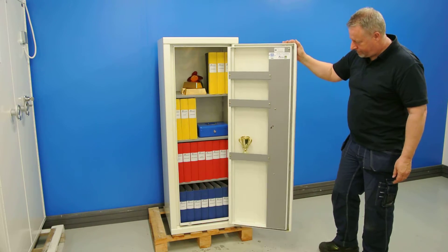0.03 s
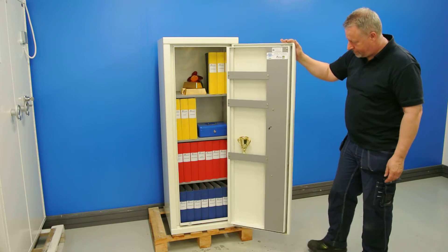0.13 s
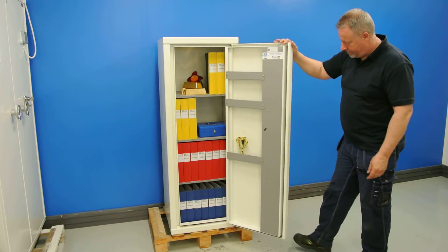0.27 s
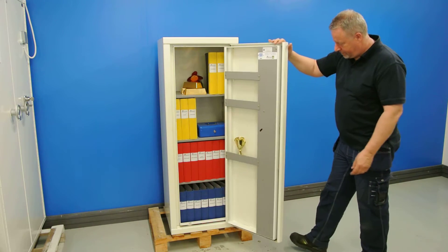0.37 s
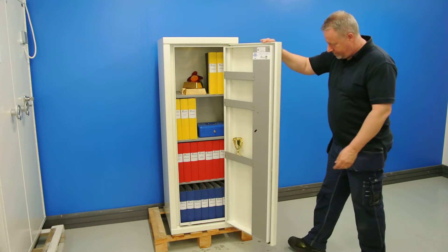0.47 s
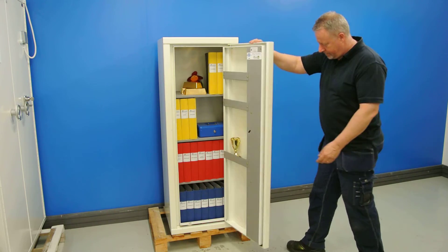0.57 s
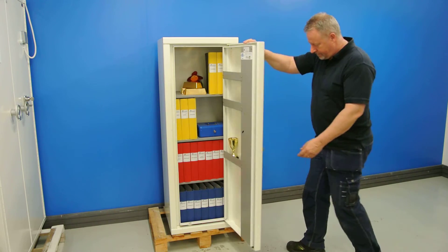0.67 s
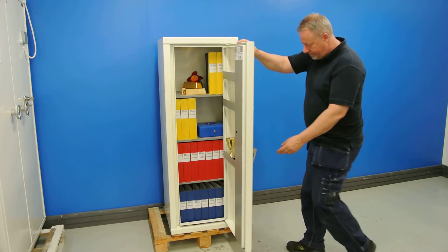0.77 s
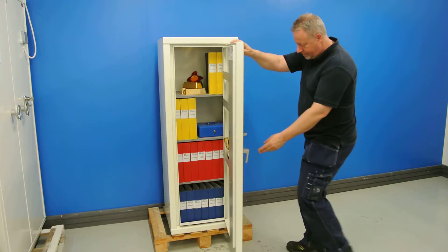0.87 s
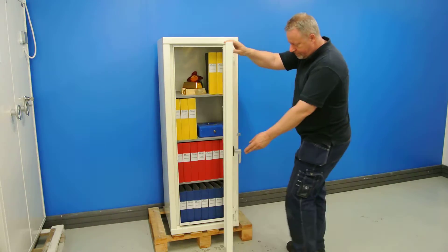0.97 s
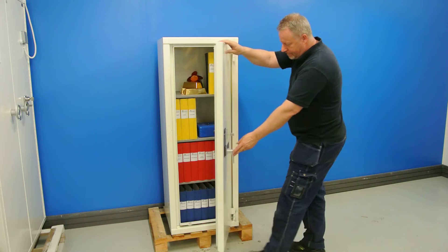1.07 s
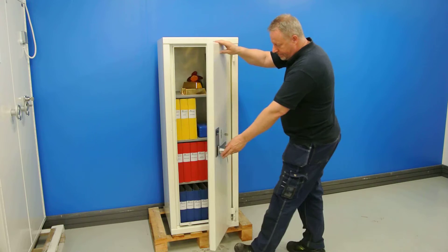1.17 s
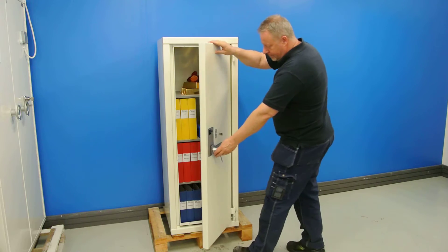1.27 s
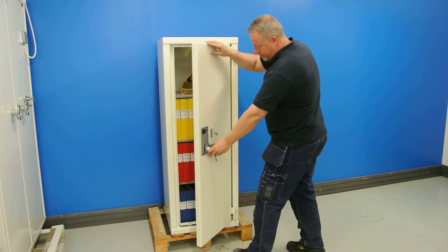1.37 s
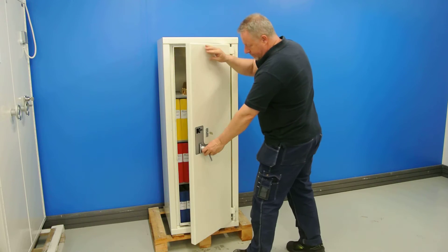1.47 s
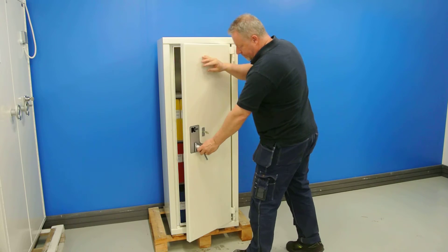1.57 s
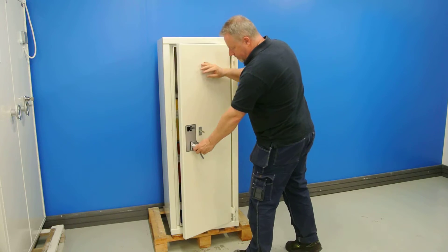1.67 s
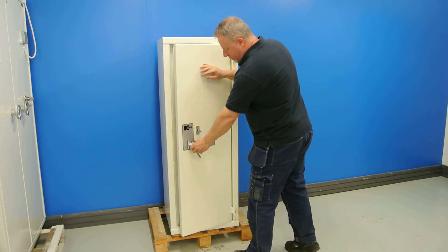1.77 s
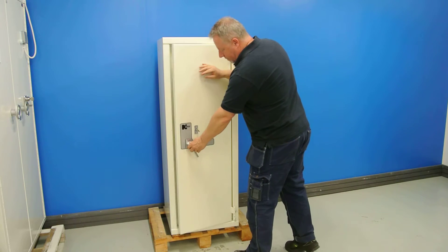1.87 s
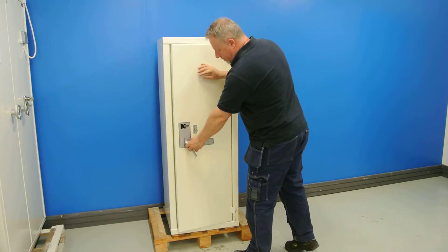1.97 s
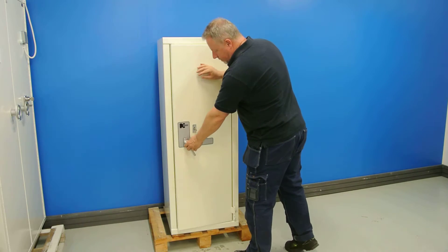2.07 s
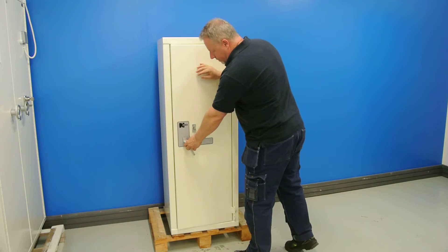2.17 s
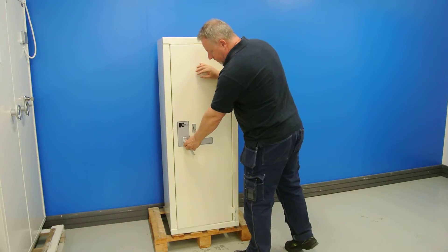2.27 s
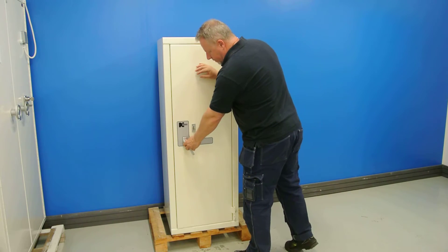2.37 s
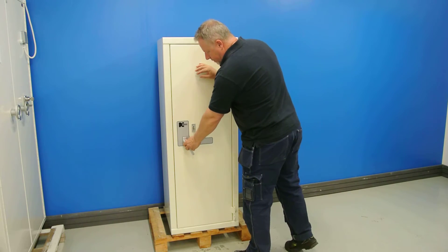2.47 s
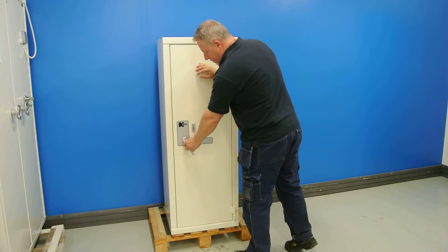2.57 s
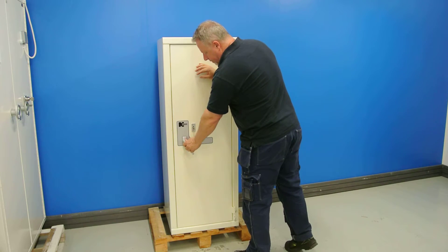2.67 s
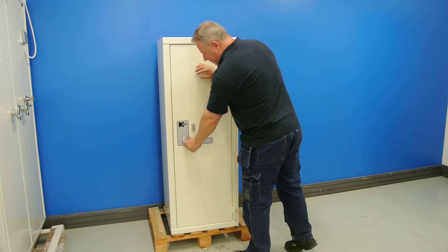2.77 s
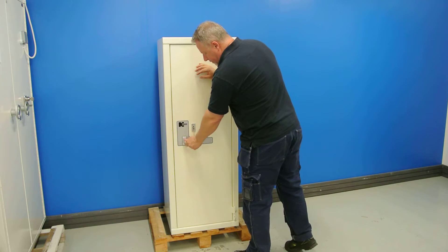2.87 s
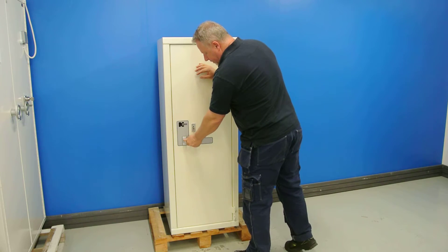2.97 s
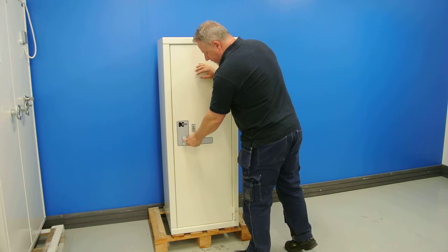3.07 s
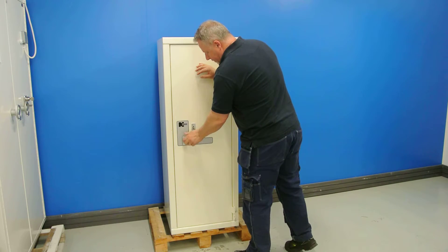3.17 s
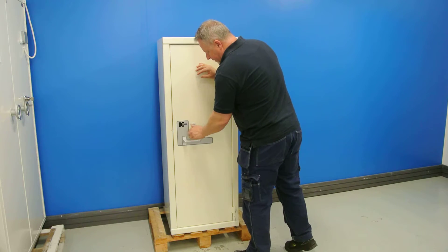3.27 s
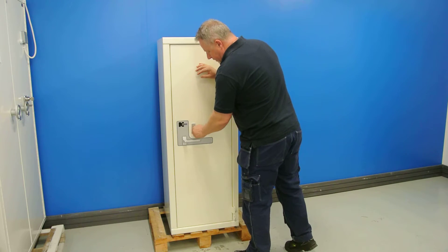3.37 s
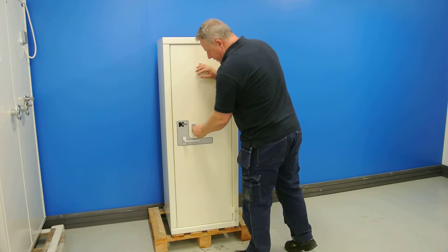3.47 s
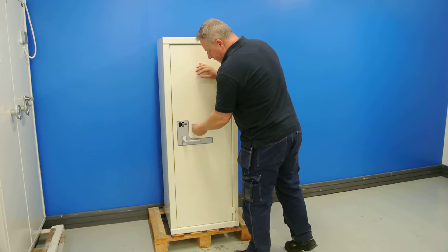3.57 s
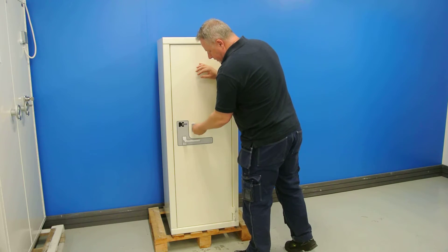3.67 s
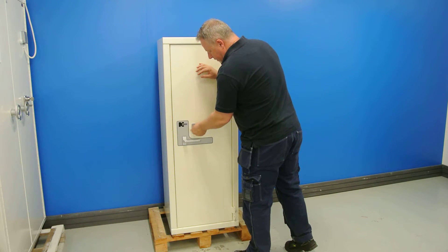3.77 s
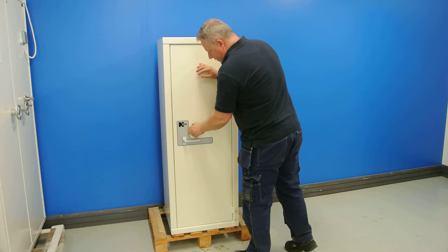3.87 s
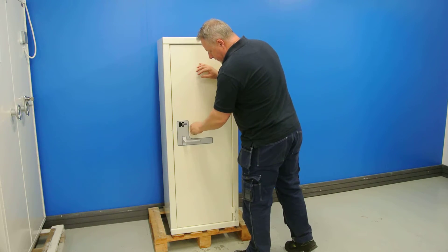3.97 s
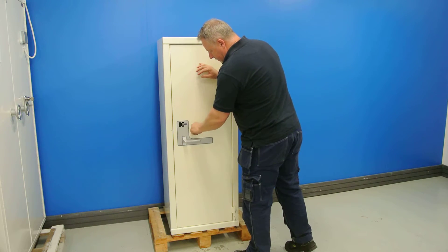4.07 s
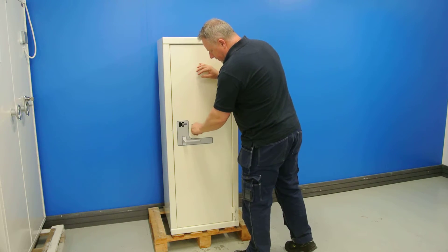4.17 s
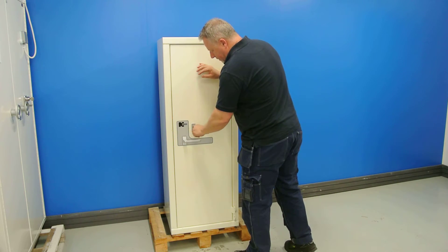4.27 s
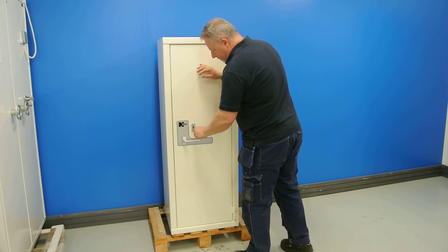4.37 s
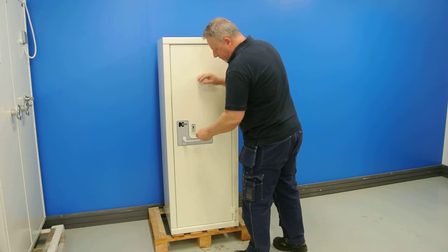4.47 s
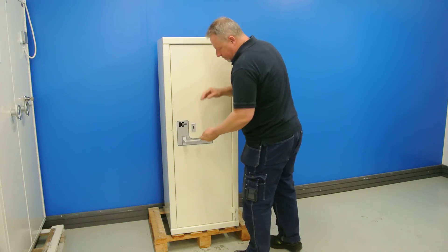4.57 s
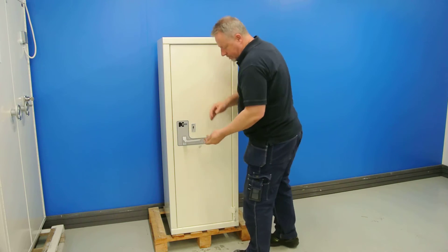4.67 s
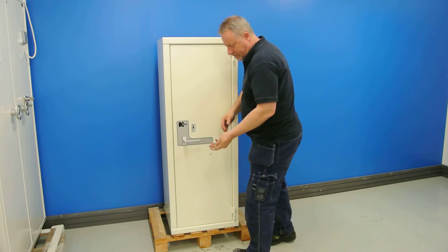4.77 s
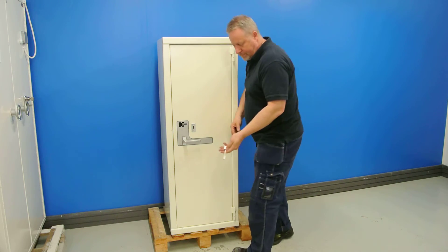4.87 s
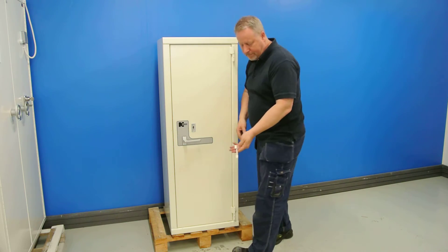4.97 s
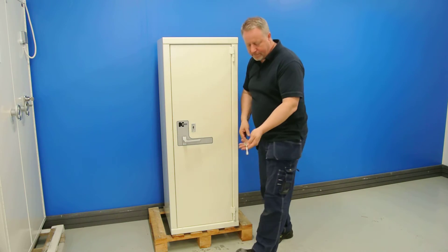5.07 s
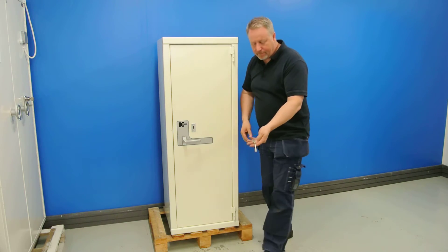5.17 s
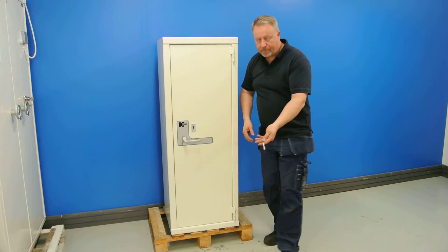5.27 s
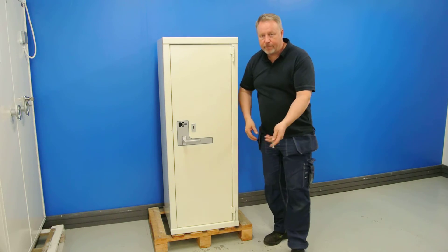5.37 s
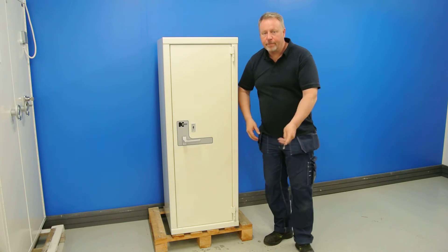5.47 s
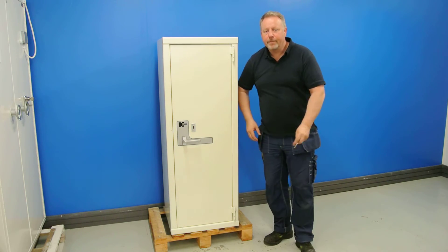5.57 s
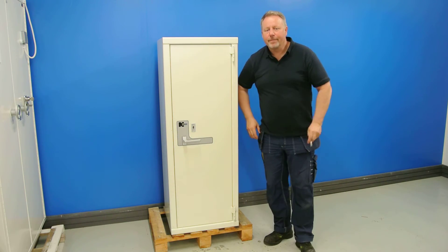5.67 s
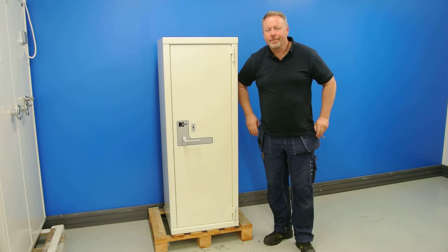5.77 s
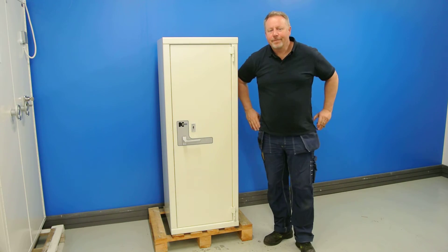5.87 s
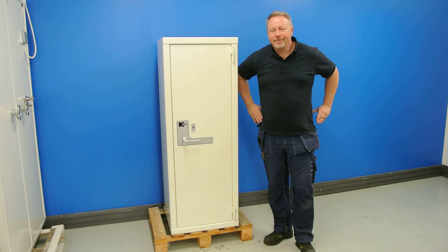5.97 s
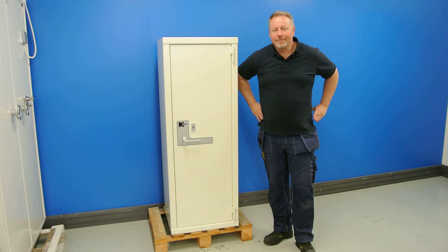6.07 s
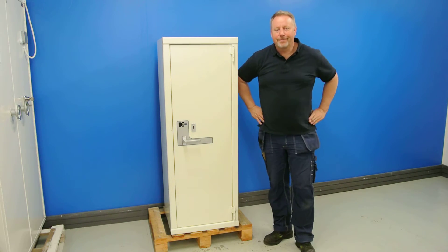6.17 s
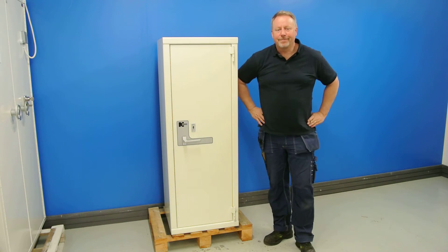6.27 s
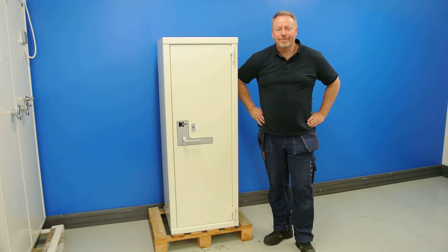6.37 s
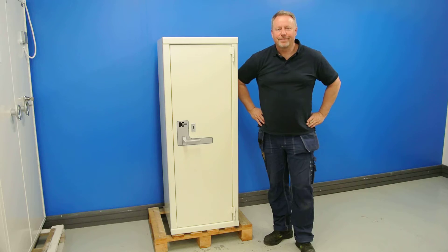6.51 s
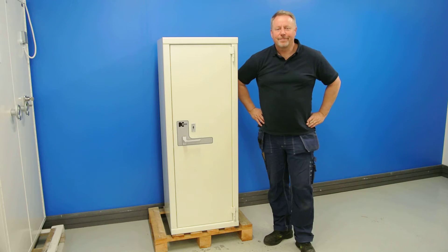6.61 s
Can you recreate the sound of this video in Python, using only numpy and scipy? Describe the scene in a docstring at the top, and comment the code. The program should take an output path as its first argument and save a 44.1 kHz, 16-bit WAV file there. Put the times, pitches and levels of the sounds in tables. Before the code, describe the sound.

In a hard-walled room a steel cabinet door bangs closed, its handle throws the bolts, and a key turns, followed by footsteps and rustling clothes.

```python
"""A heavy steel cabinet door is swung shut in a bare, hard-walled room, heard from a few metres away.
It knocks twice on the way, slams and chatters in its frame; the handle throws the bolts, a key is turned and drawn.
Blows are gritty noise bursts through a coloured filter; door panels, lock case and key ring as damped modes.
Rattling boltwork, scuffing shoes and rustling clothes, as someone steps aside, are filtered friction noise.
Ventilation hums underneath: coloured air noise and a narrow band of duct noise."""
import sys
import numpy as np
from scipy import signal
from scipy.fft import rfft, irfft, next_fast_len
from scipy.io import wavfile
from scipy.ndimage import uniform_filter1d

SR = 44100
rng = np.random.default_rng(int(sys.argv[2]) if len(sys.argv) > 2 else 0)


def wav_out(sig):
    """Save sig, one row per channel (or a flat mono array), as 16-bit PCM at SR to the path in sys.argv[1]."""
    wavfile.write(sys.argv[1], SR, np.round(np.clip(np.atleast_2d(sig).T, -1, 1) * 32767).astype(np.int16))


N = 292905  # samples

# Blow tables give levels ahead of the room; contact length is the decay of the burst's power.
# Door striking its frame: (t/s, level/dB, contact length/s, brightness/dB per octave)
SLAM_BLOWS = [(2.6995, -24, 0.0039, -0.5), (2.702, -14.5, 0.0042, 1.5), (2.7062, -11, 0.004, -1.5),
              (2.7135, -19.5, 0.01, 3), (2.738, -27, 0.011, 8), (2.757, -25, 0.0045, 1),
              (2.793, -17.5, 0.022, -1), (2.824, -16, 0.024, -0.76)]
# Handle and bolts hitting their stops: (t/s, level/dB, contact length/s, brightness/dB per octave)
BOLT_BLOWS = [(2.9865, -11, 0.0037, 5), (2.992, -16, 0.0047, 0.5), (3.012, -25, 0.031, -3),
              (3.362, -37, 0.026, 11), (3.373, -32, 0.0093, 10), (3.519, -27.5, 0.0096, 8.5),
              (3.534, -21.5, 0.014, 4.5), (3.570, -33, .008, 6), (3.591, -20.5, 0.0075, 12),
              (3.601, -24, 0.0062, 9)]
# Key working in the lock: (t/s, level/dB, contact length/s, brightness/dB per octave, ring re level/dB)
KEY_BLOWS = [(4.0284, -22, 0.0073, 0, -11), (4.134, -26, 0.049, -2.5, -22), (4.154, -27, 0.0072, 3.5, -20),
             (4.207, -25.5, 0.034, -2.5, -22), (4.223, -30.5, 0.027, -5, -25),
             (4.265, -30, .005, -1.5, -20), (4.284, -21, 0.0062, 3.5, -16), (4.293, -20.5, 0.0016, 3.5, 4),
             (4.302, -21, 0.015, -1, 2.5), (4.322, -17.5, 0.024, 2, -15)]
# Lock case and door panel clunking: (t/s, level/dB, contact length/s, brightness/dB per octave)
CLUNK_BLOWS = [(3.537, -45, 0.019, 4), (3.600, -27, 0.051, 2), (4.034, -36, 0.017, 8),
               (4.15, -38, 0.027, 4.5), (4.23, -42.5, 0.072, -8), (4.325, -24.5, 0.015, -0.5),
               (4.344, -23, 0.025, 1), (4.398, -31, 0.019, -3)]
# Loose boltwork knocking in the swinging door: (t/s, level/dB, contact length/s, brightness/dB per octave)
KNOCK_BLOWS = [(1.030, -28.5, 0.051, 1.5), (1.303, -28, 0.027, 1)]
# Footfalls: (t/s, level/dB, contact length/s, brightness/dB per octave)
FOOTFALLS = [(.625, -42, 0.0074, -3.5), (.752, -32.5, 0.027, 4), (2.15, -46.5, 0.049, -7),
             (4.838, -37.5, 0.006, 0), (4.853, -35.5, 0.035, 2.5), (5.362, -40.5, 0.02, -2.5),
             (5.495, -38, 0.015, -1.5)]
# Trouser legs flapping: (t/s, level/dB, contact length/s, brightness/dB per octave)
TROUSER_FLAPS = [(5.276, -26, 0.093, -0.5), (5.375, -32, 0.029, 2), (5.768, -41.5, 0.013, 1),
                 (6.18, -45, 0.007, 2)]

# Spectrum of the door on its frame: (f/Hz, level/dB)
SLAM_SPECTRUM = [(25, -25), (42, -19), (66, -4), (98, -11), (165, -8), (280, 1.5), (450, -3.5), (570, 1.5),
                 (680, -5), (950, 1), (1500, -4.5), (2400, -7), (3200, -3), (5000, -10), (7000, -13),
                 (9000, -17.5), (15000, -27)]
# Spectrum of the bolt blows and of the boltwork noise: (f/Hz, level/dB)
BOLT_SPECTRUM = [(40, -36), (110, -12.5), (200, -9), (600, -11), (1150, -5.5), (1500, -9.5), (1850, -3.5),
                 (2400, -7), (3200, -3.5), (4200, -7), (5400, -12.5), (6600, -13.5), (9500, -22.5),
                 (15000, -35)]
# Spectrum of the key's ticks: (f/Hz, level/dB)
KEY_SPECTRUM = [(100, -25.5), (800, -13.5), (2200, -5), (3400, -1.5), (5000, 1.5), (6200, 3.5),
                (8400, -1.5), (11000, 3), (13000, 2), (15500, -9.5)]
# Spectrum of the lock case clunks: (f/Hz, level/dB)
CLUNK_SPECTRUM = [(40, -37), (76, -14), (98, -12), (160, -7), (240, -25), (370, -2), (480, -6.5), (620, -1),
                  (780, 1.5), (1050, 0.5), (1300, -8.5), (1800, -5), (3500, -7.5), (9000, -48)]
# Spectrum of the boltwork knocks: (f/Hz, level/dB)
KNOCK_SPECTRUM = [(60, -10), (280, -7), (700, -13.5), (1100, 1), (1550, -12), (2500, -11), (3100, -12.5),
                  (7000, -18), (15000, -23.5)]
# Resonances added to the knocks: (f/Hz, width/Hz, rise/dB)
KNOCK_RESONANCES = [(404, 45, 14.5), (720, 82, 18), (1373, 62, 10), (1830, 190, 8.5), (2520, 170, 9)]
# Spectrum of a footfall: (f/Hz, level/dB)
FOOTFALL_SPECTRUM = [(40, -28), (130, -12.5), (230, 0.5), (330, -3), (500, 0.5), (750, -8.5), (1600, -4),
                     (3000, -18.5), (15000, -31)]
# Spectrum of dragging soles: (f/Hz, level/dB)
SCUFF_SPECTRUM = [(100, -27), (400, -19), (800, -8), (1700, -1.5), (2600, -3.5), (3600, 0), (5500, -10.5),
                  (15000, -13.5)]
# Spectrum of rubbing cloth: (f/Hz, level/dB)
CLOTH_SPECTRUM = [(100, -10), (500, 3), (1200, -1.5), (2200, 1), (4200, 1.5), (7000, -0.5), (13000, 0.5),
                  (16000, -7)]
# Spectrum of flapping cloth: (f/Hz, level/dB)
FLAP_SPECTRUM = [(200, -20), (1200, -25), (2200, -9), (3500, 3.5), (6000, -1.5), (15000, -5.5)]
# Spectrum of the ventilation air: (f/Hz, level/dB)
AIR_SPECTRUM = [(20, -11), (60, -3.5), (120, 0), (190, -1.5), (260, 0), (450, 1), (1000, -3), (2000, -8),
                (5000, -10), (10000, -11.5), (16000, -11.5)]

# Ringing of the steel door panels: (f/Hz, level/dB, t60/s)
PANEL_MODES = [(215, -5, 1), (270, 1, 1), (313, 0, 1), (332, -1, .9), (368, 0, 1), (463, -2, 1),
               (549, 1, 1), (592, 2, 1.05), (748, -1, .9), (790, -3, 1), (845, 1, 1), (871, 1, 1),
               (899, -2, .9), (985, -1, .9), (1023, 0, 1), (1135, -2, 1.1), (1200, -3, 1.1), (1302, -1, 1),
               (1790, -4, .85), (1825, -3, .9), (1925, -2, .85), (3107, -2, .7), (3238, -2, .65)]
# Ringing of the key: (f/Hz, level/dB, t60/s)
KEY_RING_MODES = [(9700, -15, 0.0083), (9870, 12, 0.016), (12000, -16, .015), (13750, 3, .015)]
# Hollow ringing of the lock case: (f/Hz, level/dB, t60/s)
LOCK_CASE_MODES = [(165, -7.5, 0.76), (355, 6.5, 0.52), (700, -15, 0.73), (798, 2, 0.72), (857, -10, 1.1),
                   (940, 2, 0.34), (1640, 0.5, 0.58), (1790, 0, 0.86), (2533, 0.5, 0.42)]

# Boltwork rattling on after a hit, bolts sliding, key scraping in the lock,
# one row a stretch of noise: (start t/s, length/s, level/dB)
BOLTWORK_NOISES = [(3.11, 0.078, -32.5), (3.25, 0.57, -43.5), (3.53, 0.12, -30), (4.04, 0.34, -41),
                   (4.32, 0.091, -35.5)]
# Soles dragging on the floor: (start t/s, length/s, level/dB)
SOLE_SCUFFS = [(.645, 0.12, -34), (1.66, .08, -51), (5.445, .14, -31)]
# Clothes rubbing, one row a move of an arm or leg: (t at its fastest/s, length/s, level/dB)
CLOTH_RUSTLES = [(.58, 0.33, -44), (.8, 0.21, -49), (1.35, 0.2, -43.5), (1.74, .3, -49),
                 (5.095, 0.13, -36.5), (5.33, 0.13, -37), (5.515, 0.12, -33.5), (6.13, 0.33, -46)]
# Clothes stirring faintly while the whole body moves: (start t/s, length/s, level/dB)
BODY_MOVES = [(0, 1.95, -52.5), (4.4, 1.45, -51)]

# Decay of the room: (f/Hz, t60/s)
ROOM_DECAY = [(60, 0.91), (250, 0.52), (700, 0.98), (1800, 0.96), (3500, 0.65), (6000, 0.5), (12000, 0.35)]
# Stereo width of diffuse sound: (f/Hz, side minus mid level/dB)
STEREO_WIDTH = [(60, -19), (250, -16.5), (500, -13), (1000, -7.5), (2000, -3), (4000, .5), (12000, -.5)]
# Tonal balance of the two channels: (f/Hz, left minus right level/dB)
STEREO_BALANCE = [(100, 2.5), (800, -0.5), (3000, 0), (7000, 0.5), (12000, 3)]

# A sole sweeping forward, its hollow note rising; the level is that of the noise under the note
SWEEP_START_S, SWEEP_LENGTH_S, SWEEP_NOISE_DB = .62, 0.092, -42.5
SWEEP_START_HZ, SWEEP_OCTAVES_PER_S = 403, 15
AIR_DB, HUM_HZ, HUM_DB = -49.5, 194.2, -60
TOP_HZ = 15900


def slam():
    """The heavy door strikes its frame and chatters: a cluster of gritty blows."""
    return blows(SLAM_BLOWS, SLAM_SPECTRUM, tail_db=-4.5)


def bolts():
    """Handle and bolts hit their stops as blows."""
    return blows(BOLT_BLOWS, BOLT_SPECTRUM, tail_db=-4.5)


def boltwork_noise():
    """Boltwork rattles on after a hit, bolts slide and the key scrapes: stretches of uneven friction noise."""
    stretches = strokes(BOLTWORK_NOISES, attack_s=0.019, release_s=0.053)
    noise = rubbing(stretches, BOLT_SPECTRUM, grain_db=3.5, flutter_db=3.5)
    return through(noise, room(tail_db=-21))


def panels(slam_ring_db=-7, bolt_ring_db=-12):
    """Slam and bolts set the damped modes of the steel panels ringing."""
    strikes = undb(slam_ring_db) * taps(SLAM_BLOWS) + undb(bolt_ring_db) * taps(BOLT_BLOWS)
    return through(strikes, ring(PANEL_MODES))


def lock_case(ring_db=-6):
    """Lock case and door panel clunk, and the hollow case rings on in damped modes."""
    clunks = blows(CLUNK_BLOWS, CLUNK_SPECTRUM, tail_db=-10.0)
    return clunks + undb(ring_db) * through(taps(CLUNK_BLOWS), ring(LOCK_CASE_MODES))


def knocks():
    """Loose boltwork knocks in the swinging door, with a few strong resonances."""
    return blows(KNOCK_BLOWS, KNOCK_SPECTRUM, tail_db=-9.5, peaks=KNOCK_RESONANCES)


def key(beam_db=-6, spread_db=-8):
    """The key ticks past the levers; its short high modes chime most as it snaps round."""
    ticks = blows(KEY_BLOWS, KEY_SPECTRUM, tail_db=-7.0)
    strikes = taps([(s, db + ring_db) for s, db, _, _, ring_db in KEY_BLOWS])
    chime = through(strikes, ring(KEY_RING_MODES))
    # the chime beams straight out from the door, so it is drier than the ticks
    return ticks + undb(beam_db) * chime + undb(spread_db) * through(chime, room(tail_db=-3))


def shoes():
    """Soles land as blows, kept apart from the dragging and sweeping noise they make on the floor."""
    steps = blows(FOOTFALLS, FOOTFALL_SPECTRUM, tail_db=-7)
    drag = strokes(SOLE_SCUFFS, attack_s=0.052, release_s=0.015)
    scuffs = rubbing(drag, SCUFF_SPECTRUM, grain_db=5, flutter_db=-1.0)
    return steps, sweep() + scuffs


def sweep(width_hz=130):
    """A narrow band of scraping noise swells and fades as it glides upward."""
    age = np.clip(np.arange(N) / SR - SWEEP_START_S, 0, SWEEP_LENGTH_S)
    pitch = SWEEP_START_HZ * 2 ** (SWEEP_OCTAVES_PER_S * age)
    note = np.sin(2 * np.pi * np.cumsum(pitch) / SR)
    grain = shape(rng.standard_normal(N), lambda hz: np.exp(-(hz / width_hz) ** 2))
    swell = np.sin(np.pi * age / SWEEP_LENGTH_S)
    return note * grain / grain.std() * undb(SWEEP_NOISE_DB) * swell


def clothes():
    """Trouser legs flap as soft blows; cloth rubs on cloth with each move."""
    flaps = blows(TROUSER_FLAPS, FLAP_SPECTRUM, tail_db=-10)
    walking = strokes(BODY_MOVES, attack_s=0.086, release_s=0.15)
    stir = np.hypot(swells(CLOTH_RUSTLES), walking)
    return flaps, rubbing(stir, CLOTH_SPECTRUM, grain_db=1.5, flutter_db=1)


def footwork():
    """Shoes and clothes: their blows come from separate spots, their friction from a shared one."""
    steps, soles = shoes()
    flaps, rustle = clothes()
    return steps + flaps + through(soles + rustle, room(tail_db=-11.0))


def ventilation(hum_width_hz=14):
    """Gently wavering air noise, and a duct resonance as a narrow band of noise."""
    air = through(diffuse(N), causal(AIR_SPECTRUM)) * undb(.5 * walk(9))
    hum = shape(diffuse(N), lambda hz: 1 / (1 + (2 * (hz - HUM_HZ) / hum_width_hz) ** 2))
    return undb(AIR_DB) * air + undb(HUM_DB) * hum / hum.std()


def contact(length_s, grit_db=3, size=8192):
    """Stiff parts meet at many points: a dying burst of tiny, uneven impacts, its spectrum evened."""
    t = np.arange(size) / SR
    fade = (1 - np.exp(-t / .0005)) * np.exp(-(t / max(length_s, 1e-3)) ** 1.04)
    grit = undb(grit_db * np.repeat(rng.standard_normal(size // 32), 32))
    burst = rng.standard_normal(size) * np.sqrt(fade) * grit
    # keep only the phases, then fade once more
    even = irfft(np.exp(1j * np.angle(rfft(burst))))
    return unit(even * np.sqrt(fade))


def blows(rows, colour, tail_db, peaks=()):
    """Play a table of blows, each with its own room response; level is energy over a hundredth of a second."""
    out = np.zeros((2, N + 2 * SR))
    for s, db, length_s, tilt_db, *_ in rows:
        hit = unit(signal.fftconvolve(contact(length_s), causal(colour, tilt_db, peaks)))
        heard = through(hit, room(tail_db))
        start = int(s * SR)
        out[:, start:start + heard.shape[1]] += undb(db) * np.sqrt(SR / 100) * heard
    return out[:, :N]


def taps(rows):
    """One impulse for each (t/s, level/dB) row, on the same scale as the blows."""
    out = np.zeros(N)
    for s, db, *_ in rows:
        out[int(s * SR)] = undb(db) * np.sqrt(SR / 100)
    return out


def ring(modes):
    """Impulse response of a set of damped modes with random phases, one second long."""
    t = np.arange(SR) / SR
    total = np.zeros(SR)
    for hz, db, t60 in modes:
        tone = np.sin(2 * np.pi * (hz * t + rng.random()))
        total += undb(db) * tone * np.exp(-np.log(1000) * t / t60)
    return unit(total)


def rubbing(gain, colour, grain_db, flutter_db):
    """Friction: countless small slips of uneven size, catching and letting go."""
    slips = diffuse(N) * undb(grain_db * walk(900))
    rub = through(slips / slips.std(), causal(colour))
    return rub * gain * undb(flutter_db * walk(45))


def strokes(rows, attack_s, release_s):
    """Gain of stretches of noise: each swells in, holds for its length and dies away."""
    t = np.arange(N) / SR
    power = np.zeros(N)
    for s, length_s, db in rows:
        rise = np.clip((t - s) / attack_s, 0, 1)
        fall = np.exp(-np.maximum(t - s - length_s, 0) / release_s)
        power += (undb(db) * rise * fall) ** 2
    return np.sqrt(power)


def swells(rows):
    """Gain of swinging moves: each speeds up and slows down evenly."""
    t = np.arange(N) / SR
    power = np.zeros(N)
    for s, length_s, db in rows:
        power += undb(db) ** 2 * np.exp(-(2 * (t - s) / length_s) ** 2)
    return np.sqrt(power)


def room(tail_db, direct_db=-6, early_db=-2.5, early_s=0.0092, build_s=0.016, size=36000):
    """Response from one spot: direct sound, quick bounces off floor and wall, a tail decaying band by band."""
    t = np.arange(size) / SR
    hz, t60 = np.transpose(ROOM_DECAY)
    octave = np.log2(np.maximum(np.fft.rfftfreq(size, 1 / SR), 1))
    spectrum, tail = rfft(diffuse(size)), 0
    # overlapping bands that sum to one, each with its own decay
    for share, seconds in zip(np.eye(len(hz)), t60):
        band = irfft(spectrum * np.interp(octave, np.log2(hz), share))
        tail = tail + band * np.exp(-np.log(1000) * t / seconds)
    response = undb(tail_db) * tail * (1 - np.exp(-t / build_s)) / np.sqrt(SR / 100)
    soon = t[:size // 20]
    bounces = diffuse(len(soon)) * np.exp(-soon / early_s) * (soon > .001)
    response[:, :len(soon)] += undb(early_db) * np.sqrt(2) * unit(bounces)
    response[:, 0] += undb(direct_db)
    return response


def diffuse(n):
    """Noise from all directions: alike in both channels in the bass, unrelated in the treble."""
    mid, side = rng.standard_normal((2, n))
    side = shape(side, lambda hz: undb(along(STEREO_WIDTH, hz)))
    both = np.array([mid + side, mid - side])
    return shape(both, lambda hz: 1 / np.hypot(1, undb(along(STEREO_WIDTH, hz))))


def walk(rate):
    """Slow random wandering with a spread near one, heading for a new value `rate` times a second."""
    k = int(SR / rate)
    return uniform_filter1d(np.repeat(rng.standard_normal(N // k + 1), k), k)[:N]


def causal(colour, tilt_db=0, peaks=(), size=8192):
    """The sharpest causal (minimum-phase) click with this spectrum, tilt in dB per octave and resonances."""
    hz = np.fft.rfftfreq(size, 1 / SR)
    db = along(colour, hz) + tilt_db * np.log2(np.maximum(hz, 100))
    for centre, width, rise in peaks:
        db = db + rise / (1 + (2 * (hz - centre) / width) ** 2)
    # fold the cepstrum onto positive time
    cepstrum = irfft(np.log(undb(db)))
    cepstrum[1:size // 2] *= 2
    cepstrum[size // 2 + 1:] = 0
    return unit(irfft(np.exp(rfft(cepstrum))))


def through(x, response):
    """Pass a sound through an impulse response, on one or two channels."""
    return signal.fftconvolve(np.atleast_2d(x), np.atleast_2d(response), axes=1)[:, :N]


def shape(x, gain_at):
    """Filter by a gain that depends on frequency."""
    n = next_fast_len(x.shape[-1], True)
    return irfft(rfft(x, n) * gain_at(np.fft.rfftfreq(n, 1 / SR)), n)[..., :x.shape[-1]]


def along(points, hz):
    """Read (f/Hz, value) points on a log-frequency axis."""
    f, value = np.transpose(points)
    return np.interp(np.log(np.maximum(hz, 1)), np.log(f), value)


def unit(x):
    """Scale to a total energy of one."""
    return x / np.sqrt(np.sum(x ** 2))


def undb(db):
    """Decibels to gain."""
    return 10 ** (np.asarray(db) / 20)


def scene():
    """Cabinet, key and footwork share one room and stereo balance, with ventilation underneath."""
    cabinet = slam() + bolts() + boltwork_noise() + panels() + lock_case() + knocks()
    near = cabinet + key() + footwork()
    balanced = []
    for channel, side in zip(near, (1, -1)):
        # half of the left-right difference goes to each channel
        balanced.append(shape(channel, lambda hz: undb(side * along(STEREO_BALANCE, hz) / 2)))
    return np.array(balanced) + ventilation()


def record(dry):
    """A steep elliptic low-pass cuts the top of the treble."""
    return signal.sosfilt(signal.ellip(10, .2, 80, TOP_HZ, fs=SR, output="sos"), dry)


dry = scene()
out = record(dry)
wav_out(out)
```